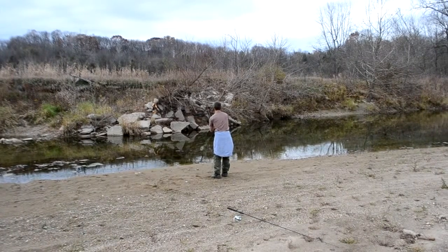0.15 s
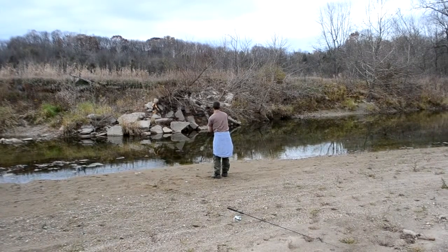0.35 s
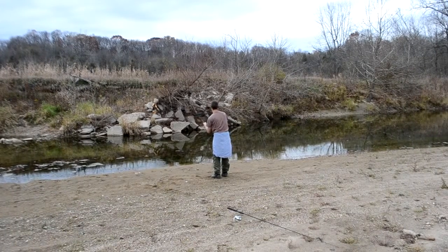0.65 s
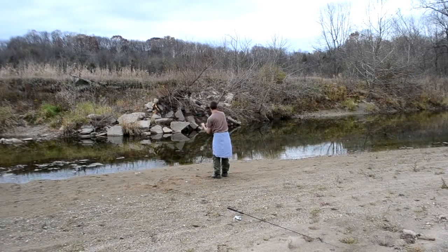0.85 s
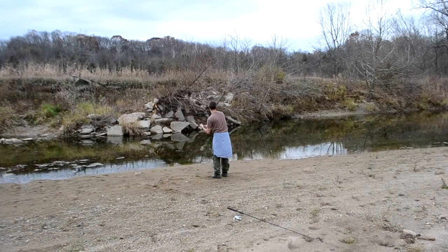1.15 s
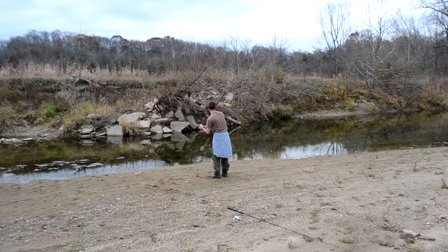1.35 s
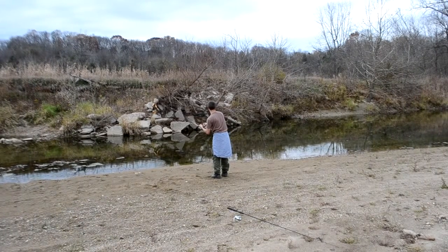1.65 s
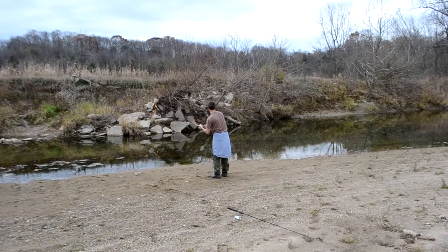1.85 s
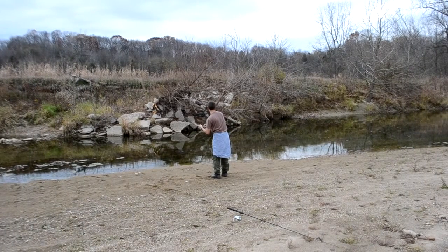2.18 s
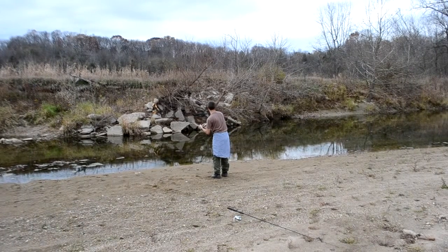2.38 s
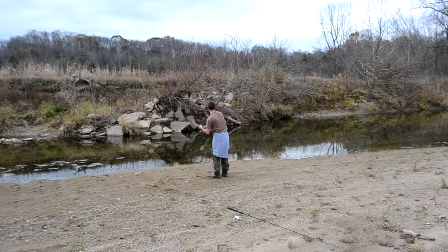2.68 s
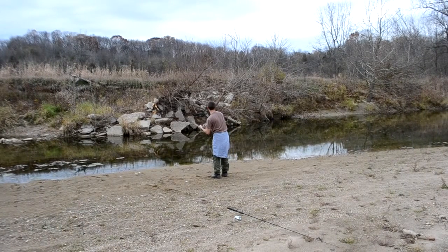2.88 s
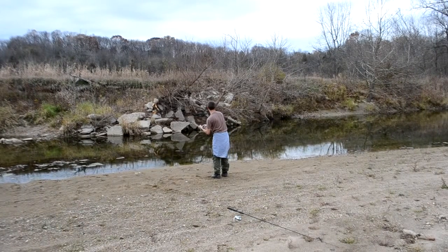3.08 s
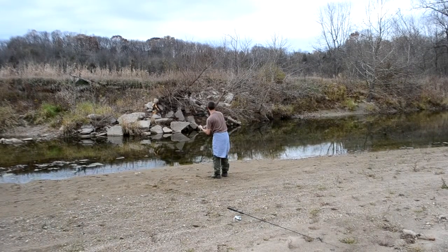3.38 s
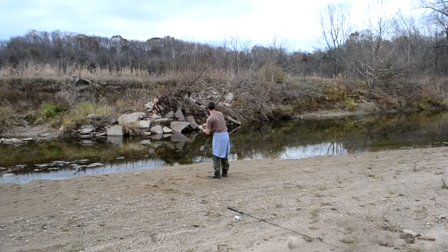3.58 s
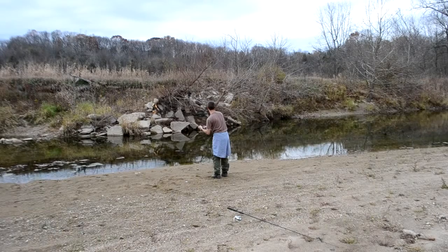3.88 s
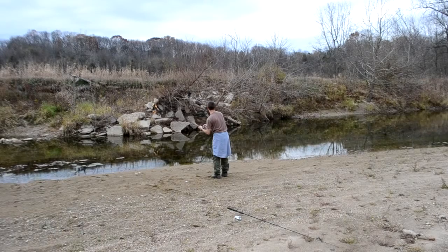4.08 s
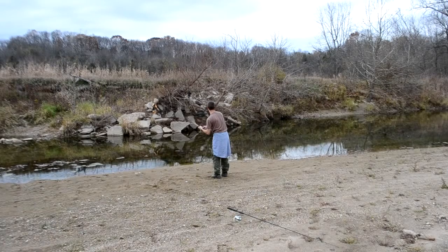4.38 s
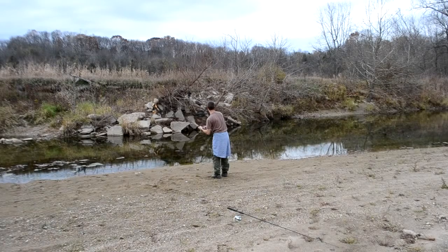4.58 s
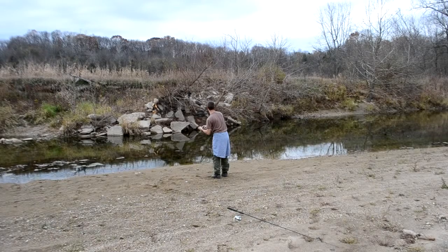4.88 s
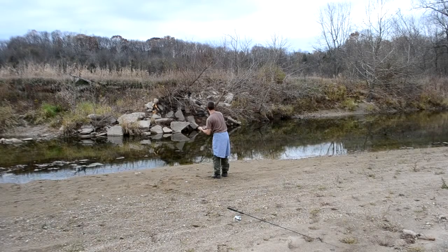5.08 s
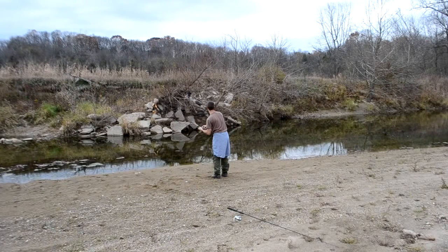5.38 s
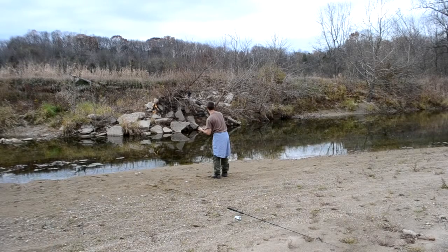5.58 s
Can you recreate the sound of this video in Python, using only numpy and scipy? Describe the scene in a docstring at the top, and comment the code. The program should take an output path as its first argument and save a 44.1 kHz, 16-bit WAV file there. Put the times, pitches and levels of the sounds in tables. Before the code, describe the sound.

A light spinning rod is cast twice on an open creek bank, heard close to the microphone. Line patters and hisses fast, then softens as the lure slows. Near-quiet follows, with low breeze bumps and a faint fast insect rasp; a small bird chips once early. Then the reel clicks, the rod whips, and the line runs again with loose slaps.

```python
"""Line whips off a light spinning rod in two casts beside a quiet creek: patter and hiss in the guides, softer
and duller as the lure slows, with loops of line slapping the rod. The first cast is already running at the
start; before the second the bail clicks open and the rod swishes, made of ringing reel modes and shaped noise.
A katydid rasps in wing strokes, a small bird chips once as a hoarse sine with an echo, and light air bumps
the microphone over a hush of filtered noise and faint far-off tones."""
import sys
import numpy as np
from scipy import signal
from scipy.fft import rfft, irfft, next_fast_len
from scipy.io import wavfile
from scipy.ndimage import map_coordinates

SR = 44100
rng = np.random.default_rng(int(sys.argv[2]) if len(sys.argv) > 2 else 0)


def persist_wave(psi):
    """Save psi, clipped to +-1, as 16-bit WAV."""
    counts = np.round(np.clip(psi, -1, 1) * 32767).astype(np.int16)
    wavfile.write(sys.argv[1], SR, np.atleast_2d(counts).T)


N = 253134
TIME = np.arange(N) / SR  # seconds


def amp(db):
    """Decibels to gain."""
    return 10 ** (np.asarray(db) / 20)


def unit(x):
    """Scale to rms 1."""
    return x / np.sqrt(np.mean(x ** 2) + 1e-20)


def wobble(rate):
    """A smooth random curve through `rate` random knots a second."""
    knots = rng.standard_normal(int(N * rate / SR) + 4)
    return map_coordinates(knots, [TIME * rate])


def filtered(x, response):
    """Multiply the spectrum of x by a response given as a function of Hz."""
    size = next_fast_len(N + 8192)
    hz = np.fft.rfftfreq(size, 1 / SR)
    return irfft(rfft(x, size) * response(hz), size)[:N]


def coloured(x, points, size=4096):
    """Pass x through a causal, minimum-phase filter with the given (Hz, dB) outline."""
    outline_hz, outline_db = np.transpose(points)
    log_hz = np.log(np.fft.rfftfreq(size, 1 / SR) + 1)
    gain = amp(np.interp(log_hz, np.log(outline_hz), outline_db))
    # folding the cepstrum forward gathers the energy at the start of the impulse
    cepstrum = irfft(np.log(np.maximum(gain, 1e-6)))
    cepstrum[1:size // 2] *= 2
    cepstrum[size // 2 + 1:] = 0
    impulse = irfft(np.exp(rfft(cepstrum)))
    return signal.fftconvolve(x, impulse)[:len(x)]


def noise(points):
    """Coloured noise of rms 1."""
    return unit(coloured(rng.standard_normal(N), points))


def swells(rows):
    """Gain curve of bell-shaped swells, each (s, dB, half length s), summed in power."""
    power = sum(amp(db) ** 2 * np.exp(-((TIME - s) / width) ** 2) for s, db, width in rows)
    return np.sqrt(power)


def add(track, s, sound):
    """Mix a short sound into the track at time s."""
    part = track[max(round(s * SR), 0):][:len(sound)]
    part += sound[:len(part)]


def contacts(rate, scatter_db, rub):
    """Random taps of uneven size, `rate` a second, on top of steady rubbing."""
    struck = rng.random(N) < rate / SR
    taps = struck * rng.choice([-1, 1], N) * amp(scatter_db * rng.standard_normal(N))
    return unit(unit(taps) + rub * rng.standard_normal(N))


# Colour of far wind and water. Each row: frequency in Hz, level in dB.
HUSH_COLOUR = [(15, -28), (30, -20), (70, -13), (170, -8.5), (280, -8), (550, -3.5), (1150, -0.5),
               (1900, -6.5), (2450, -12.5), (3000, -14.5), (4000, -22), (7500, -32), (9750, -49),
               (16500, -100)]
# Slow rise and fall of the hush. Each row: time in seconds, level in dB.
HUSH_LEVEL = [(0, -52), (1.5, -52.5), (1.8, -50.5), (2.1, -52.5), (4.4, -52.5), (5.0, -54), (5.4, -52),
              (5.74, -54.5)]


def hush():
    """Far wind and water blend into coloured noise whose level drifts."""
    level_db = np.interp(TIME, *np.transpose(HUSH_LEVEL)) + 0.47 * wobble(11.0)
    return amp(level_db) * noise(HUSH_COLOUR)


# Faint tones and narrow hiss far off. Each row: centre in Hz, width in Hz, level in dB.
DRONE_BANDS = [(121, 15, -75), (372, 33, -76.5), (544, 7, -72), (2714, 280, -68.5), (3540, 240, -80)]


def drone():
    """Faint wavering tones and thin whines: each carrier drifts at random in level and phase."""
    out = np.zeros(N)
    for hz, width, db in DRONE_BANDS:
        drift = wobble(width) + 1j * wobble(width)
        tone = (drift * np.exp(2j * np.pi * hz * TIME)).real
        out += amp(db) * unit(tone)
    return out


# Colour of breeze rumble on the microphone. Each row: frequency in Hz, level in dB.
BREEZE_COLOUR = [(15, -13), (50, -2), (100, 2.5), (190, -8), (320, -27), (800, -69)]


def breeze():
    """A light breeze rumbles on the microphone: low noise with two puffs over a faint floor."""
    puffs = swells([(1.25, -63.5, 0.13), (1.8, -73, 0.064)])
    return (puffs + amp(-76.5)) * amp(3 * wobble(15)) * noise(BREEZE_COLOUR)


# Puffs of air on the microphone. Each row: centre in seconds, peak in dB, pulse frequency in Hz.
PUFFS = [(1.149, -46, 84.5), (1.171, -45, 130), (1.189, -51, 160), (1.297, -55, 110), (1.545, -48, 119),
         (1.714, -50, 149), (1.77, -47.5, 100), (2.21, -53, 71), (2.7, -57, 60), (3.546, -51, 70),
         (3.83, -56, 60), (4.371, -56, 65)]


def bumps():
    """Each puff of air gives the microphone one rounded push with a rebound on either side."""
    out = np.zeros(N)
    for s, db, hz in PUFFS:
        u = np.pi * hz * (TIME - s)
        out += amp(db) * (1 - 2 * u ** 2) * np.exp(-u ** 2)
    return out


# Colour of the katydid's wings, near and far. Each row: frequency in Hz, level in dB.
WING_COLOUR = [(6000, -25), (7850, -10), (8300, -1), (8650, -1), (9200, -3), (9750, -0.5), (10150, -0.5),
               (10800, -7.5), (11400, -20), (12000, -32), (13800, -15), (15000, -35)]
STROKES_PER_S, STROKE_DRIFT = 28.6, 0.023  # wing rate, and the share by which it slowly wanders
KATYDID_DB, WARM_UP_DB, WARM_UP_S = -69.5, 11, 0.62  # the song swells to full level


def katydid(stroke=0.053, closing_db=6.0, opening_db=-1, opening_at=0.36, wing_hz=9150, wing_width_hz=1300):
    """Each wing cycle gives a strong closing rasp and a weak opening one, over a chorus farther off."""
    level_db = KATYDID_DB - WARM_UP_DB * np.exp(-TIME / WARM_UP_S)
    rate = STROKES_PER_S * (1 + STROKE_DRIFT * wobble(0.96) + 0.0207 * wobble(11))
    cycle = np.cumsum(rate) / SR

    def rasp(at):  # one bell per wing cycle; stroke and at are shares of the cycle
        return np.exp(-.5 * (((cycle - at) % 1 - .5) / stroke) ** 2)

    force = amp(1.8 * wobble(30) + 1.3 * wobble(4))
    strokes = force * (amp(closing_db) * rasp(0) + amp(opening_db) * rasp(opening_at))
    # the near wing's own resonance
    wing = unit(filtered(noise(WING_COLOUR), lambda hz: 1 / (1 + 2j * (hz - wing_hz) / wing_width_hz)))
    chorus = 0.63 * noise(WING_COLOUR)
    return amp(level_db) * unit(strokes * wing + chorus)


def bird(at=1.422, pitch_hz=7000, chip_db=-64, length=0.011, echo_delay=.035, echo_db=-69):
    """One thin chip, hoarse from fast random pitch jitter, answered by the far bank."""
    hz = pitch_hz * (1 + .05 * wobble(1500))
    chip_and_echo = swells([(at, chip_db, length), (at + echo_delay, echo_db, length)])
    return chip_and_echo * np.sin(2 * np.pi * np.cumsum(hz) / SR)


# The rod swings. Each row: centre in seconds, level in dB, half length in seconds.
ROD_SWINGS = [(3.025, -51.5, 0.02), (3.089, -44.5, 0.018), (3.143, -38.5, 0.0081), (3.16, -48, .012),
              (3.21, -53, 0.11), (3.295, -44, 0.015)]
# Colour of the swish, and of the bail's buzz. Each row: frequency in Hz, level in dB.
SWISH_COLOUR = [(350, -42), (600, -18), (1000, -12), (1360, 3.5), (2050, -1), (2610, 1.5), (3540, -5.5),
                (6350, -11), (7620, -19.5), (8500, -15), (11000, -39), (14300, -65), (22000, -120)]


def swing():
    """Taut line scrapes in the guides as the rod swings back and forward."""
    grain = contacts(rate=1300, scatter_db=3, rub=.5)
    return swells(ROD_SWINGS) * unit(coloured(grain, SWISH_COLOUR))


# The bail snaps open. Each row: start in seconds, level in dB.
BAIL_CLICKS = [(2.9957, -20.5)]
# Ringing modes of the reel. Each row: frequency in Hz, level in dB, 60 dB decay time in seconds.
REEL_MODES = [(1330, -4, 0.015), (1630, -6, 0.013), (3220, 4, 0.0083), (3760, 4.5, 0.0059),
              (5140, -3, 0.013), (7050, -11, 0.0056), (9050, -14, 0.0075)]


def bail(attack=0.00017, crack_db=-10, crack_t60=.004, tail_db=-26, tail_t60=0.092, edge_hz=10300):
    """The wire bail clicks over: a crack, short reel modes, then a faint buzz of its spring."""
    out, t = np.zeros(N), np.arange(SR // 10) / SR
    for s, db in BAIL_CLICKS:
        ring = sum(amp(level - 60 * t / t60) * np.sin(2 * np.pi * hz * t) for hz, level, t60 in REEL_MODES)
        ring = ring * (1 - np.exp(-t / attack))
        crack_fade = amp(crack_db - 60 * t / crack_t60)
        tail_fade = amp(tail_db - 60 * t / tail_t60)
        buzz = noise(SWISH_COLOUR)[:len(t)] * (crack_fade + tail_fade)
        add(out, s, amp(db) * (ring / np.abs(ring).max() + buzz))
    return filtered(out, lambda hz: 1 / (1 + (hz / edge_hz) ** 20))


# Loops of line slapping the rod. Each row: start in seconds, level in dB before the overall slap trim.
LINE_SLAPS = [(0.0304, -18.5), (0.0345, -19), (0.0471, -18.5), (0.051, -19), (0.0874, -15.5), (0.0919, -19),
              (0.1142, -22), (0.131, -16), (0.1585, -22), (0.215, -23), (0.4378, -28.5), (0.489, -28),
              (0.498, -29), (0.5258, -27.5), (3.3051, -15.5), (3.34, -13.5), (3.396, -17.5), (3.401, -20.5),
              (3.4418, -14.5), (3.4775, -17.5), (3.523, -21), (3.537, -18.5), (3.547, -19), (3.7702, -28)]
# The rod's answer to a slap. Each row: frequency in Hz, level in dB.
ROD_ANSWER = [(200, -32.5), (420, -15), (750, -3), (1450, 7), (2150, 0), (2750, -9.5), (3900, -9),
              (7400, -23), (11000, -62), (16000, -100)]


def slaps(t60=0.028, chatter=0.11, slap_db=-3.0, hard_db=-20, dull_hz=4200):
    """A loop strikes the rod and chatters briefly against it; slaps below hard_db are duller."""
    out, t = np.zeros(N), np.arange(2048) / SR
    for s, db in LINE_SLAPS:
        blow = (t == 0) + chatter * rng.standard_normal(len(t)) * amp(-60 * t / t60)
        softness = max(hard_db - db, 0)
        answer = [(hz, level - softness * hz / dull_hz) for hz, level in ROD_ANSWER]
        sound = coloured(blow, answer)
        add(out, s, amp(db + slap_db) * sound / np.abs(sound).max())
    return out


# Colour of fast line on the rod. Each row: frequency in Hz, level in dB.
FAST_LINE = [(150, -75), (250, -34), (442, -18), (606, -5.5), (656, -15.5), (710, -3.5), (930, 2),
             (1110, -4), (1420, 5.5), (2330, 1), (2640, -9), (3860, -13), (7390, -32), (9510, -42.5),
             (11000, -62.5), (14300, -109), (22000, -120)]
SHAKE_DB, SHAKE_S = -15, 0.01  # rattle relative to the slap's table level, and its decay constant


def shaken_line():
    """After each slap the line goes on rattling for a moment, as fading noise."""
    power = np.zeros(N)
    for s, db in LINE_SLAPS:
        fade = (TIME >= s) * np.exp(-np.abs(TIME - s) / SHAKE_S)
        power += (amp(db + SHAKE_DB) * fade) ** 2
    shake = np.sqrt(power)
    rattle = unit(coloured(shake * rng.standard_normal(N), FAST_LINE))
    return np.sqrt(np.mean(shake ** 2)) * rattle


WHIP_FALL_DB_PER_S, COAST_FALL_DB_PER_S, LANDED_FALL_DB_PER_S = 45, 5, 25  # the rush dies fast, the flight slowly


def cast_level(start, whip_db, hold, coast_db, flight):
    """Line noise in dB: a rush that holds and dies, over a coasting that fades once the lure has landed."""
    age = np.maximum(TIME - start, 0)
    whip = whip_db - WHIP_FALL_DB_PER_S * np.maximum(age - hold, 0)
    landed = np.maximum(age - flight, 0)
    coast = coast_db - COAST_FALL_DB_PER_S * age - LANDED_FALL_DB_PER_S * landed
    return 20 * np.log10(np.hypot(amp(whip), amp(coast)) + 1e-9)


# Line running out. Each row: release in seconds, first rush in dB, its hold in seconds, coasting in dB,
# flight in seconds.
LINE_CASTS = [(-0.02, -33.5, 0.16, -43.5, 1.15), (3.3, -33.5, 0.16, -43, 1.2)]
# Colour of slow line on the rod. Each row: frequency in Hz, level in dB.
SLOW_LINE = [(180, -41), (300, -47.5), (476, -13), (572, -13.5), (735, -3), (1050, -4), (1380, 1),
             (2000, -4), (2500, -9), (3720, -6.5), (7000, -27), (9100, -77), (15400, -120)]
# Loose line billows and rubs harder. Each row: centre in seconds, extra level in dB, half length in seconds.
LINE_BILLOWS = [(0.238, 3.5, 0.023), (0.49, 1.5, 0.065), (0.744, 2.5, 0.049), (1.082, 2, 0.049),
                (3.655, 3, 0.014), (3.764, 3, 0.025), (4.05, 4, 0.056), (4.253, 3, 0.052), (4.405, 1, 0.06)]
LEAD_S, ATTACK_S = 0.02, 0.062  # line slips before the release, and is at full speed soon after it
HISS_GROWS = 1  # extra dB of hiss for each dB of line noise


def running_line(split_hz=2870, body_db=-0.35, hiss_db=-6, fast_db=-35, blend_db=3, surge_db=0.64):
    """Coils leave the spool and patter along the rod, over the hiss of the guides; fast line is brighter."""
    out = np.zeros(N)
    billow = sum(db * np.exp(-((TIME - s) / width) ** 2) for s, db, width in LINE_BILLOWS)

    def low(hz):  # share of the sound below the split
        return 1 / (1 + (hz / split_hz) ** 6)

    for start, *throw in LINE_CASTS:
        drive = cast_level(start, *throw)
        level = drive + billow + surge_db * wobble(40)
        bright = HISS_GROWS * (drive - fast_db)
        running = np.clip((TIME - start + LEAD_S) / (LEAD_S + ATTACK_S), 0, 1)
        flutter = amp(1.1 * wobble(150))
        patter = flutter * contacts(rate=1400, scatter_db=2.5, rub=.6)
        # crossfade from fast to slow colour as the line quietens
        speed = .5 + .5 * np.tanh((drive - fast_db) / blend_db / 2)
        fast = unit(filtered(coloured(patter, FAST_LINE), low))
        slow = unit(filtered(coloured(patter, SLOW_LINE), low))
        body = speed * fast + (1 - speed) * slow
        sliding = patter + 1.05 * flutter * rng.standard_normal(N)
        hiss = unit(filtered(coloured(sliding, FAST_LINE), lambda hz: 1 - low(hz)))
        out += running * amp(level) * (amp(body_db) * body + amp(bright + hiss_db) * hiss)
    return out


def scene():
    """Tackle close by, the creek bank all around."""
    bank = hush() + drone() + breeze() + bumps() + katydid() + bird()
    tackle = swing() + bail() + slaps() + shaken_line() + running_line()
    return (bank + tackle)[None]


def record(dry, top_hz=15200):
    """The recorder keeps nothing above its band limit."""
    return np.array([filtered(channel, lambda hz: hz < top_hz) for channel in dry])


dry = scene()
out = record(dry)
persist_wave(out)
```